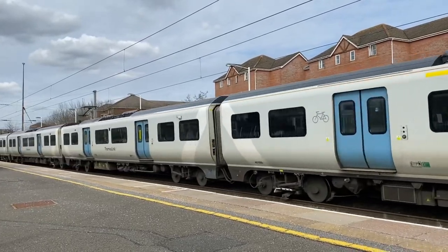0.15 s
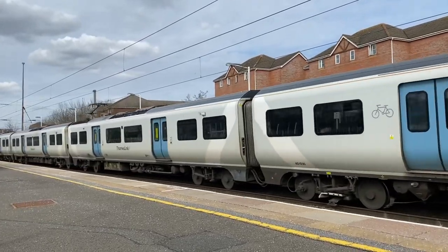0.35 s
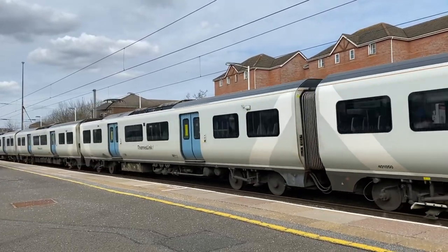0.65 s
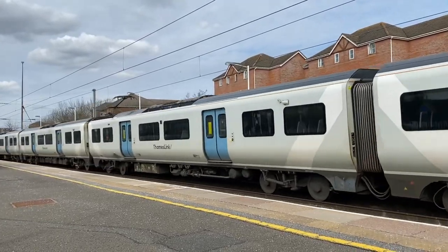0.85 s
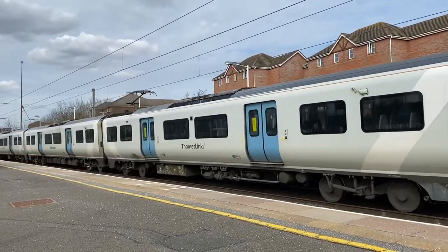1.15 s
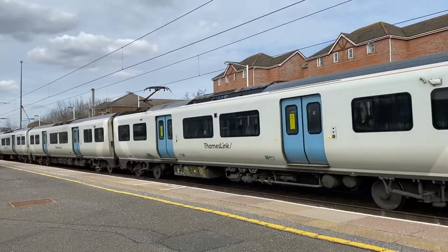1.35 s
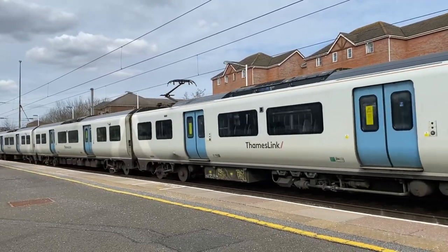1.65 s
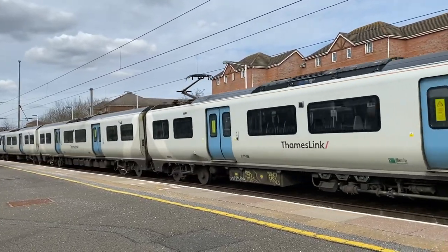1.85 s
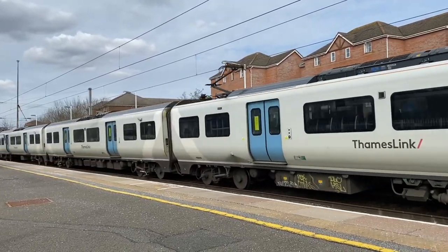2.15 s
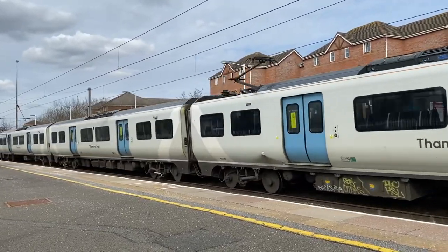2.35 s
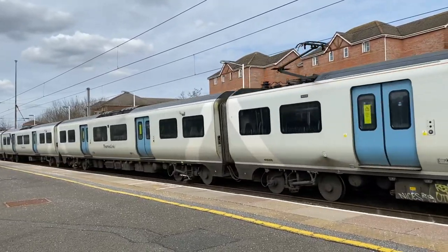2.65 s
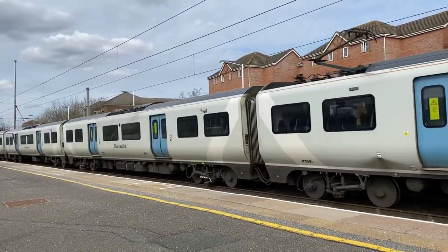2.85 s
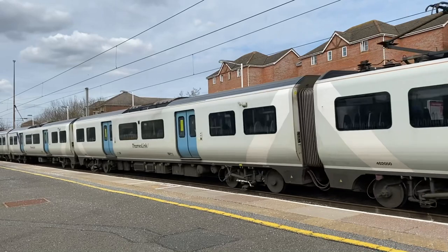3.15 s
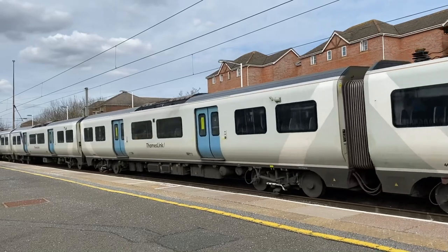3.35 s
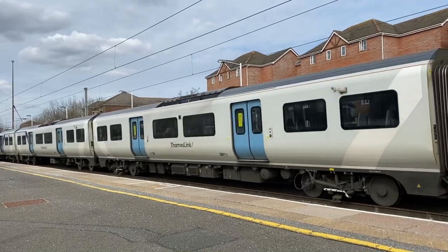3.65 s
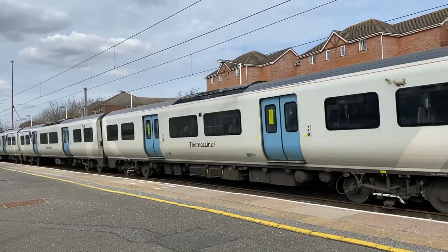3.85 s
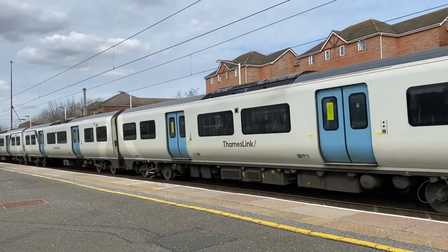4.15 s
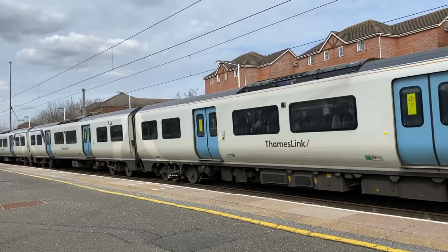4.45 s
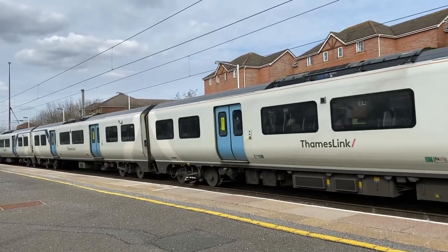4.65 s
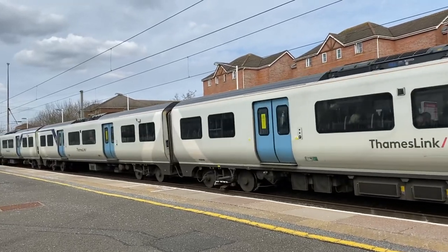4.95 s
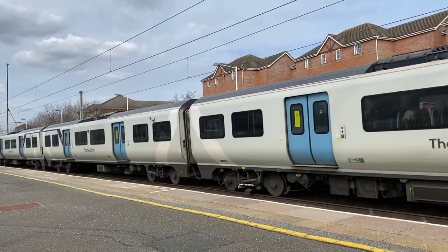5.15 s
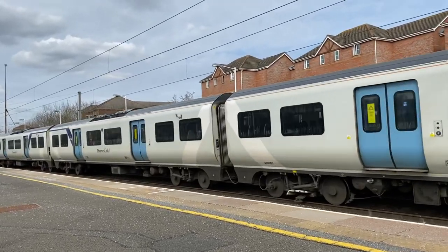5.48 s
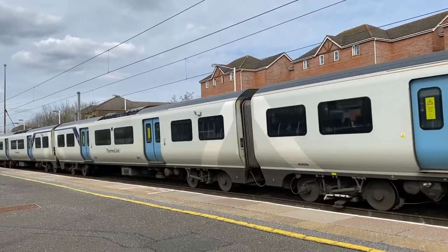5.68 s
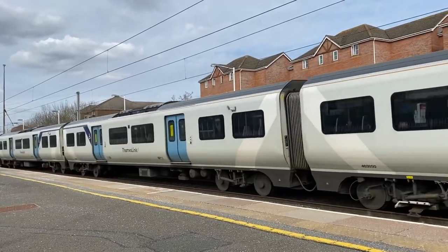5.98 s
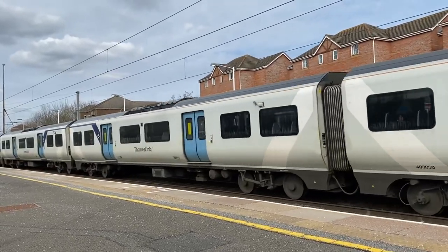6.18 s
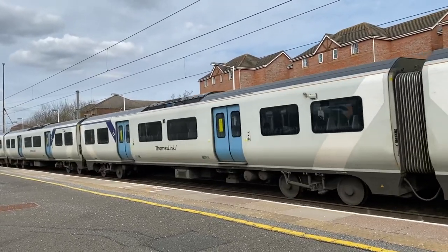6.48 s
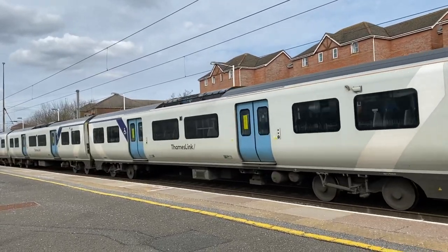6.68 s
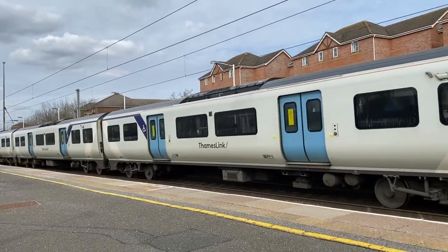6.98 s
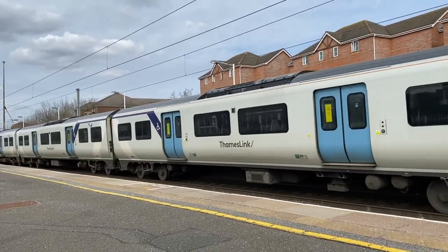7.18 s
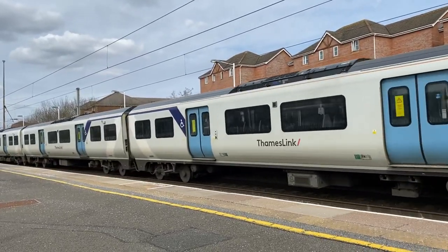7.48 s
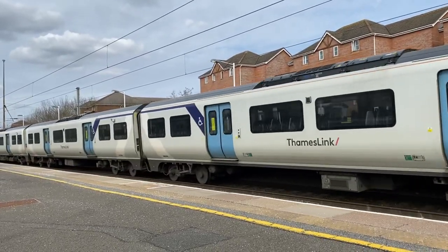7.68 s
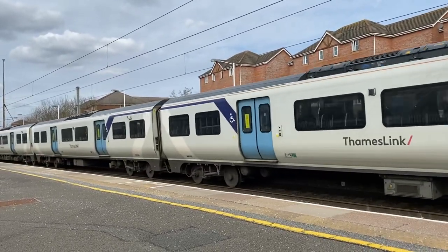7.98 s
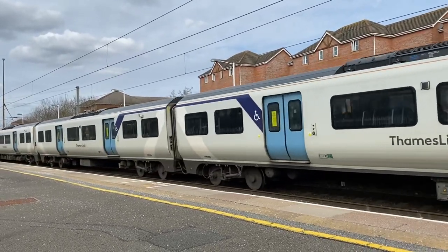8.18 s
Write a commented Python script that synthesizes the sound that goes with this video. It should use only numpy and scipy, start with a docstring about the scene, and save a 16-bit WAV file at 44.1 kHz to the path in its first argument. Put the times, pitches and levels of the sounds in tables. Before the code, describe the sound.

Gusty wind thumps on the microphone as a slow electric train passes with a wavering high whine, low rumble and airy hiss.

```python
"""An electric train rolls slowly along a platform, some metres from a phone held in a gusty breeze.
From the start the traction inverters whine on multiples of a wandering switching rate, swelling as each
motor bogie passes; ringing bands flicker around the whine, the track rumbles, cooling air hisses, and
wind buffets the microphone ports. After 3 s the wind drops and bares the train, with one faint click at
4.3 s. Near 6 s the gusts return, and towards 8 s the rumble and hiss ease off."""
import sys
import numpy as np
from scipy import signal
from scipy.fft import rfft, irfft, next_fast_len
from scipy.io import wavfile
from scipy.ndimage import uniform_filter1d

SR = 44100
rng = np.random.default_rng(int(sys.argv[2]) if len(sys.argv) > 2 else 0)


def to_wav(sig):
    """Store sig (one row per channel, or 1-D mono) as 16-bit WAV at the path in sys.argv[1].

    Samples outside -1..1 are clipped; the rate is SR.
    """
    pcm = np.clip(np.atleast_2d(sig), -1, 1) * 32767
    pcm = np.round(pcm).astype(np.int16)
    wavfile.write(sys.argv[1], SR, pcm.T)  # frames by channels


N = 366912
T = np.arange(N) / SR
SIZE = next_fast_len(N)
BINS = np.maximum(np.arange(SIZE // 2 + 1) * SR / SIZE, 1)  # Hz

# eddies hitting the ports: (time [s], thump level [dB], pitch [Hz], left minus right [dB], pop level [dB])
BUFFETS = [(.72, -27, 89.5, 4, -43), (.845, -21, 91, 0, -36), (1.188, -19, 111, 2, -30),
           (1.371, -14.5, 84.7, 2, -20), (1.419, -14.5, 132, 1, -22), (1.452, -19, 100, 0, -30),
           (1.531, -20, 151, -10, -30), (1.569, -17.5, 149, 3.5, -34), (1.742, -17.5, 119, 0, -32),
           (1.893, -15, 105.5, 2, -45), (1.935, -19, 85, 0, -36), (2.068, -16, 73.4, 1, -22),
           (2.1, -17, 100, 0, -24), (2.128, -15, 78, 0, -23), (2.181, -17, 100, 0, -23),
           (2.254, -14.5, 127, -1, -20.5), (2.275, -19, 85, 0, -30), (2.37, -19.5, 90, 0, -33),
           (2.488, -18, 130, 3, -28), (2.525, -21, 90, 0, -36), (2.563, -19.5, 120, 1, -21.5),
           (2.598, -20, 110, 0, -27), (2.617, -19, 150, -.5, -28), (2.627, -21, 140, 0, -19),
           (2.681, -12.5, 126, 3, -19), (2.69, -16, 99, 2, -12.5), (2.874, -19, 89.4, 1, -24),
           (3.18, -34, 120, 0, -26.5), (3.214, -21.5, 120, 2, -27), (3.229, -22, 80, 2, -19.5),
           (3.259, -24, 85, 0, -34), (3.316, -28, 190, -1, -18), (3.338, -21, 191, 2, -29),
           (3.355, -30, 130, 2, -24), (3.5, -26, 90, 0, -43), (3.92, -26, 91, -2, -26.5),
           (4.7, -25.5, 82, 0, -36), (5.429, -31, 113, 0, -25.5), (5.949, -20.5, 92, -4, -40),
           (6.05, -23, 107, 2, -26), (6.221, -37, 168, 5, -42), (6.3, -36, 152, -4, -25),
           (6.399, -23, 92, 0, -34), (6.433, -16, 92.5, -7, -40), (6.679, -20.5, 106, 5, -38),
           (6.905, -15, 92, 6, -26.5), (6.973, -20.5, 80, 9, -44), (7.061, -18, 78, 8, -34),
           (7.086, -31, 100, 4, -25), (7.114, -25, 110, 0, -33), (7.15, -22, 140, -2, -23),
           (7.18, -13.5, 437, 6, -21), (7.23, -21, 85, 0, -32), (7.331, -14.5, 92, -1, -40),
           (7.395, -19, 110, 0, -30), (7.44, -19.5, 110, 8, -32), (7.631, -23, 92, 7, -29),
           (7.756, -17.5, 110, 2, -20.5), (7.94, -25, 81, -10, -36), (8.101, -23.5, 84.5, -0.5, -27),
           (8.159, -40, 112, 2, -25), (8.27, -27, 90, 0, -40)]


def whine():
    """Each inverter's switching rate scatters at random, so its higher multiples smear wider."""
    # main partials: (multiple of the switching rate)
    multiples = (1, 2, 3, 4, 10)
    # motor bogies passing: (time nearest [s], half length [s], then a level for each multiple [dB])
    motors = [(0, 0.16, -43.5, -45, -52, -52, -72), (0.45, 0.32, -46.5, -38.5, -54, -52, -70),
              (1.3, 0.47, -49.5, -43.5, -57, -55, -69), (2.1, 0.36, -53, -40.5, -66, -53.5, -88),
              (2.8, 0.29, -51, -43.5, -61, -54.5, -83), (3.7, 0.48, -47.5, -39, -53.5, -51.5, -68),
              (4.35, 0.34, -50.5, -48, -53, -53.5, -70), (4.9, 0.5, -50, -42, -61, -56, -67),
              (5.65, 0.4, -51, -39, -58, -56.5, -64), (6.6, 0.46, -55.5, -42, -58, -56, -65),
              (7.65, 0.55, -55.5, -44.5, -56, -62, -71)]
    # partials that ride on the 4th: (multiple, level against the 4th [dB])
    upper = [(5, -14.5), (6, -6)]
    # brief surges of the 2nd multiple: (time [s], half length [s], boost [dB])
    surges = [(0.302, 0.059, 4), (0.752, 0.047, 1.5), (1.78, .06, 2.5), (1.99, .05, 1), (3.202, 0.034, 5.5),
              (3.359, 0.017, 3), (3.5, .03, 1), (3.64, 0.039, 6), (3.85, 0.042, 3.5), (5.2, 0.046, 3.5),
              (5.454, .08, 2), (5.66, 0.032, 2.5), (5.937, 0.1, 6), (7.4, 0.026, 1), (7.705, 0.028, 5),
              (8.2, 0.12, 1.5)]
    # scatter of the switching rate, one per inverter: (spread [Hz])
    scatters = [20.92, 28.95, 37.05, 47.57]
    gains = np.sqrt(sum((swell(s, half) * undb(db)[:, None]) ** 2 for s, half, *db in motors))
    surge_db = sum(db * swell(s, half) ** 2 for s, half, db in surges)
    flutter_db = 1.1 * walk(16)
    gains[1] *= undb(surge_db + flutter_db)
    partials = list(zip(multiples, gains)) + [(k, gains[3] * undb(db)) for k, db in upper]
    switch_hz = 1359 - 1.6 * T + 6 * walk(5)  # all inverters sag and wander together
    out = 0
    for scatter_hz in scatters:
        phase = np.cumsum(switch_hz + scatter_hz * walk(480)) * 2 * np.pi / SR
        throb = undb(3 * walk(20))  # each throbs alone, less on higher multiples
        out = out + sum(g * throb ** min(1, 2 / k ** 1.9) * np.sin(k * phase) for k, g in partials)
    return undb(-2.5) * out * np.sqrt(2 / len(scatters)) + thin_tones(gains)


def thin_tones(gains):
    """A steadier carrier sings inside the whine, with sidebands spaced by the motor current."""
    # tones: (multiple of the carrier, offset [steps of the motor frequency])
    sidebands = [(1, -1), (1, 0), (1, 1), (2, -3), (2, -2), (2, -1), (2, 0), (2, 1)]
    # one per tone: (level against its multiple [dB])
    sideband_db = [-14, -4, -12, -17, -23, -8.5, -8, -12.5]
    carrier_hz, motor_hz, scatter_hz = 1372 - 1.5 * T, 48, 5
    out = 0
    for (k, step), db in zip(sidebands, sideband_db):
        gain = gains[k - 1] * undb(db + 2.7 * walk(16))
        hz = k * carrier_hz + step * motor_hz + k * scatter_hz * walk(40)
        out = out + gain * np.sin(np.cumsum(hz) * 2 * np.pi / SR)
    return np.sqrt(2) * out


def ringing_bands():
    """Flickering, slowly fading bands of ringing, mostly midway between the whine's partials."""
    # bands: (pitch [Hz], width [Hz])
    bands = [(820, 92), (2130, 104), (3330, 360), (4750, 130), (6800, 150)]
    # one per band: (starting level [dB], slope [dB/s], flicker [dB])
    levels = [(-53, -1.26, 7), (-54, -0.65, 2.5), (-45.5, -1.32, 2), (-60, -0.6, 0), (-71, -0.46, 3.5)]
    return sum(undb(db + slope * T + flicker_db * walk(6)) * ring(hz, width)
               for (db, slope, flicker_db), (hz, width) in zip(levels, bands))


def ringing_swells():
    """Brief ringing swells, narrow or broad, on and between the whine's partials."""
    # swells: (time loudest [s], half length [s], pitch [Hz], width [Hz], level [dB])
    swells = [(0.41, 0.085, 2160, 47, -42.5), (0.14, 0.14, 2170, 90, -50), (.3, 0.24, 1960, 200, -54),
              (0.78, 0.21, 3500, 250, -52), (0.58, 0.49, 3960, 130, -57), (3.8, .2, 2070, 150, -51),
              (4, 0.32, 3930, 51, -57), (0.44, 0.51, 2650, 400, -44.5), (0.94, .25, 5500, 140, -53),
              (1.57, 0.14, 4700, 75, -52), (1.8, .15, 3980, 65, -53), (2.4, 0.057, 1180, 25, -48),
              (2.88, 0.071, 1100, 21, -46), (2.96, 0.22, 2000, 70, -55), (3.54, 0.53, 2970, 180, -46.5),
              (1.73, 0.39, 2980, 90, -51), (0.8, 0.16, 1350, 45, -45), (4.07, .1, 2190, 61, -55),
              (3.6, .5, 4740, 220, -57), (6.2, 0.28, 4770, 200, -58.5), (4.1, .4, 6760, 250, -64),
              (5.85, 0.62, 6800, 190, -66), (5.8, .6, 6100, 200, -71), (4.6, 0.16, 2900, 40, -55),
              (5.47, 0.2, 1100, 25, -51.5), (5.75, .15, 2060, 70, -53.5), (4.3, 0.49, 3380, 200, -50.5),
              (5.74, .6, 3360, 200, -53), (5.2, 0.45, 4130, 90, -54.5), (6.45, 0.4, 4100, 100, -52.5),
              (6.302, 0.13, 1280, 39, -50.5), (7.278, 0.053, 4750, 35, -54.5), (7.55, 0.11, 1240, 35, -53),
              (7.603, 0.09, 4760, 55, -57)]
    return sum(undb(db) * swell(s, half) * ring(hz, width) for s, half, hz, width, db in swells)


def rail_drone():
    """The rail bounces on its sleepers: a broad low drone with a narrow hum at its core."""
    # drone fader: (time [s], level [dB])
    fader = [(0, -36), (.45, -37.5), (.83, -36.5), (1.1, -40.5), (1.4, -35.5), (1.8, -38), (2.13, -35.5),
             (2.55, -41.5), (3, -48.5), (3.6, -43), (4.36, -37.5), (5.14, -37.5), (6.05, -39),
             (6.26, -36.5), (6.95, -41), (7.4, -38), (8.32, -49)]
    waver = undb(1.6 * walk(16))
    body = ring(hz=252, width=134)
    hum = undb(-4.5 + 1.26 * walk(13)) * ring(hz=278.5, width=32)
    return undb(envelope(fader)) * waver * (body + hum)


def track_rumble():
    """Rail roughness shakes the track into a dark, wide rumble."""
    # rumble fader: (time [s], level [dB])
    fader = [(0, -35), (1.4, -36), (2.1, -38.5), (3, -36.5), (4.6, -38.5), (5.5, -39), (6.3, -40.5),
             (7.6, -42), (8.32, -43)]
    # rumble colour: (frequency [Hz], relative level [dB])
    colour = [(60, 7), (150, 1), (280, -3), (420, -0.5), (540, -6), (850, -3.5), (1200, -6.5), (1600, -14),
              (1950, -11.5), (2380, -16), (3000, -20.5), (4500, -39.5)]
    return undb(envelope(fader)) * flickering(colour, flicker_db=1.5, rate_hz=14)


def cooling_air():
    """Fans and roof gear hiss; the sizzle above 12 kHz rises and falls on its own."""
    # hiss fader: (time [s], level [dB])
    fader = [(0, -50.5), (1.35, -48), (2.4, -51.5), (3.2, -51), (3.7, -50.5), (4.4, -49.5), (5.3, -53),
             (6.9, -53), (8.32, -58.5)]
    # hiss colour: (frequency [Hz], relative level [dB])
    colour = [(700, -41), (1500, 2.5), (4000, 6), (5100, 3), (6500, 2.5), (7300, -2), (9500, -2),
              (11000, -9), (12200, -27), (12850, -24), (13500, -12), (14500, -5.5), (15300, -9)]
    # high shelf on the sizzle: (time [s], gain [dB])
    shelf = [(0, 1), (1, -3), (2.3, -6), (3, -1), (3.6, 3), (5, 1.5), (6, 6), (7.2, 2), (8.32, -6)]
    hiss = flickering(colour, flicker_db=1, rate_hz=13)
    sizzle = irfft(rfft(hiss, SIZE) * (BINS > 12000), SIZE)[:N]
    sizzle_gain = undb(envelope(shelf) + 1.2 * walk(7))
    return undb(envelope(fader)) * (hiss - sizzle + sizzle_gain * sizzle)


def click():
    """A faint click: a few milliseconds of band-passed noise."""
    # click: (time [s], level before the band-pass [dB])
    hits = [(4.302, -22)]
    out, t, decay_s = np.zeros(N), np.arange(800) / SR, .006
    for s, db in hits:
        i = int(s * SR)
        out[i:i + len(t)] += undb(db) * rng.standard_normal(len(t)) * np.exp(-t / decay_s)
    return signal.sosfilt(signal.butter(3, [2600, 4200], "bandpass", fs=SR, output="sos"), out)


def wind():
    """Eddies at the ports: low noise in ragged puffs, stirred up just behind each buffet."""
    # breeze fader: (time [s], level [dB])
    fader = [(0, -28.5), (.4, -29.5), (1.0, -31.5), (1.32, -28.5), (1.7, -35), (2.1, -29.5), (2.7, -28),
             (2.82, -34), (2.96, -38.5), (3.15, -51), (3.75, -52), (4.0, -41), (4.4, -48), (4.8, -39.5),
             (5.3, -39.5), (5.68, -49), (5.85, -30.5), (6.05, -30), (6.26, -33), (6.6, -30.5), (7.1, -31.5),
             (7.46, -30.5), (8.0, -30.5), (8.32, -38)]
    edge_hz, alike = 206, .31
    colour = BINS / (BINS + 30) / (1 + BINS / 80) / (1 + (BINS / edge_hz) ** 4)
    puff_db = 2.3 * walk(25) + 2.1 * walk(11)
    mid, side = (unit(undb(puff_db + 2 * walk(40)) * noise(colour)) for _ in range(2))
    stir_power = sum((undb(db - 17.5) * swell(s + .017, half=.028)) ** 2 for s, db, *_ in BUFFETS)
    gain = np.sqrt(undb(envelope(fader)) ** 2 + stir_power)
    return gain * (mid + np.sqrt((1 - alike) / (1 + alike)) * np.array([side, -side]))


def buffets():
    """Single hard eddies strike the ports: a low thump with a short pop on top."""
    out, pop_hz = np.zeros((2, N)), 270.6
    for s, thump_db, thump_hz, left_db, pop_db in BUFFETS:
        i = int(s * SR)
        pan = undb(np.array([[left_db], [-left_db]]) / 2)
        for hit in undb(thump_db) * burst(thump_hz), undb(pop_db) * burst(pop_hz):
            out[:, i:i + len(hit)] += pan * hit[:N - i]
    return out


def rasp():
    """Each pop leaves a short rough trail of mid-bass air."""
    trail_db, decay_s = -9.5, .021
    power = sum(undb(pop_db + trail_db) ** 2 * (T > s) * np.exp(-2 * np.abs(T - s) / decay_s)
                for s, *_, pop_db in BUFFETS)
    gain = np.sqrt(np.abs(uniform_filter1d(power, size=200)))
    mid, side = (undb(3 * walk(60)) * ring(hz=278, width=303) for _ in range(2))
    return gain * (mid + .57 * np.array([side, -side]))


def stereo_spread(mid, side):
    """Left and right are partly alike; a phase shift puts some treble in antiphase, wide and hollow."""
    # what both sides share: (frequency [Hz], shared part [0-1])
    coherence = [(60, .65), (300, .72), (700, .55), (1400, .64), (3000, .63), (6500, .6), (8400, .9),
                 (15000, .92)]
    # left-right phase shift: (frequency [Hz], left lead [rad])
    phase_shift = [(0, 0), (1290, -2.5), (2580, 1.1), (3010, 0.5), (6890, 0.1), (8350, -3.1), (8870, -3.5),
                   (9650, -6.3), (10900, -6.4), (11300, -9.4), (12800, -9.4), (13200, -12.6),
                   (14500, -12.5), (15600, -16.1)]
    # stereo balance: (frequency [Hz], left minus right [dB])
    balance = [(60, -4.5), (110, 0.5), (200, -2.5), (380, 1.5), (700, -4.5), (1290, -1.5), (2380, 0),
               (4400, 2), (8120, 0.5), (15000, 0)]
    alike, pan = spectrum(coherence), undb(spectrum(balance) / 2)
    common = rfft(mid, SIZE) * np.sqrt(1 + alike)
    apart = rfft(side, SIZE) * np.sqrt(1 - alike)
    lead = np.exp(1j * np.interp(BINS, *np.transpose(phase_shift)))
    left, right = (common + apart) * pan * lead, (common - apart) / pan
    return irfft(np.array([left, right]), SIZE)[:, :N]


def undb(db):
    """Decibels to gain."""
    return 10 ** (np.asarray(db) / 20)


def unit(x):
    """Scale to an RMS of 1."""
    return x / np.sqrt(np.mean(x ** 2))


def envelope(table):
    """A (time [s], value) table at every sample."""
    return np.interp(T, *np.transpose(table))


def spectrum(table):
    """A (frequency [Hz], value) table at every bin."""
    hz, value = np.transpose(table)
    return np.interp(np.log(BINS), np.log(hz), value)


def swell(s, half):
    """A gain that peaks at time s and is 3 dB down `half` seconds to either side."""
    return 1 / np.sqrt(1 + ((T - s) / half) ** 4)


def walk(rate_hz):
    """Smooth random modulation: steps at the given rate, slewed twice, RMS 1."""
    hold = max(int(SR / rate_hz), 2)
    steps = np.repeat(rng.standard_normal(N // hold + 1), hold)
    return unit(uniform_filter1d(uniform_filter1d(steps, hold), hold)[:N])


def noise(gain):
    """Noise with the given gain at each frequency bin."""
    return irfft(rfft(rng.standard_normal(SIZE)) * gain, SIZE)[:N]


def ring(hz, width):
    """Noise through a resonance, `width` Hz wide at -6 dB."""
    return unit(noise(1 / (1 + (2 * (BINS - hz) / width) ** 2)))


def flickering(colour, flicker_db, rate_hz):
    """Coloured noise in bands 1.5 octaves apart, each wavering on its own."""
    gain, position = undb(spectrum(colour)), np.log2(BINS / 60) / 1.5
    bands = (np.clip(1 - abs(position - k), 0, 1) ** .5 for k in range(7))
    return unit(sum(undb(flicker_db * walk(rate_hz)) * noise(gain * band) for band in bands))


def burst(hz):
    """A few cycles that swell fast and fade, their pitch falling through hz."""
    cycles = 2.52
    length_s = cycles / hz
    x = np.arange(int(4 * length_s * SR)) / SR / length_s
    return 3 * x * np.exp(1 - 3 * x) * np.sin(2 * np.pi * cycles * x * (1.35 - .4 * x))


def train():
    """The moving train: whine and ringing over track and fans."""
    return whine() + ringing_bands() + ringing_swells() + rail_drone() + track_rumble() + cooling_air()


def scene():
    """The long train reaches the ports from many places at once; the wind hits them directly."""
    return stereo_spread(mid=train() + click(), side=train()) + wind() + buffets() + rasp()


def record(dry):
    """The phone thins the deepest bass and cuts the top."""
    low_cut_hz, high_cut_hz = 55, 15350
    thin = signal.sosfilt(signal.butter(3, low_cut_hz, "highpass", fs=SR, output="sos"), dry)
    return signal.sosfilt(signal.ellip(10, .2, 80, high_cut_hz, fs=SR, output="sos"), thin)


dry = scene()
out = record(dry)
to_wav(out)
```